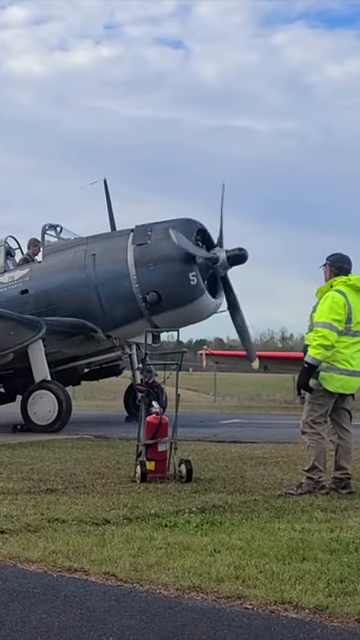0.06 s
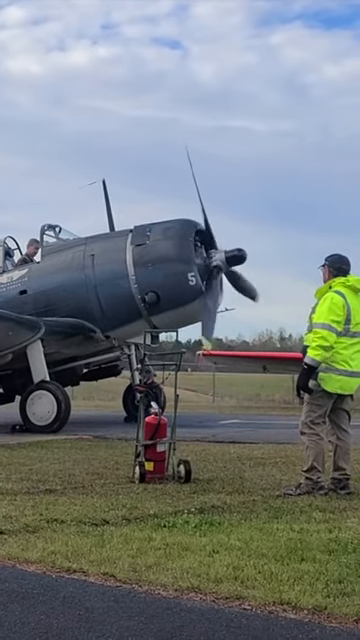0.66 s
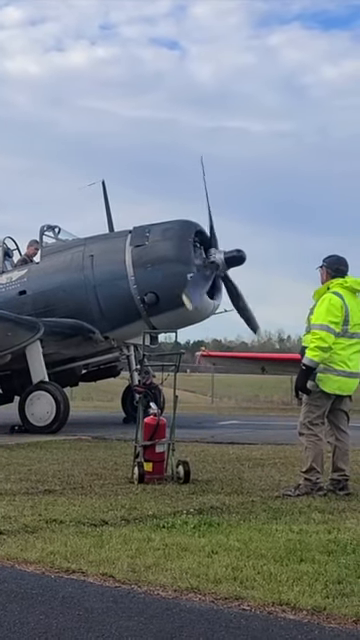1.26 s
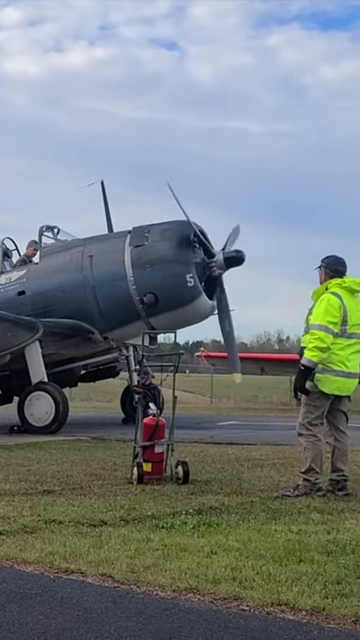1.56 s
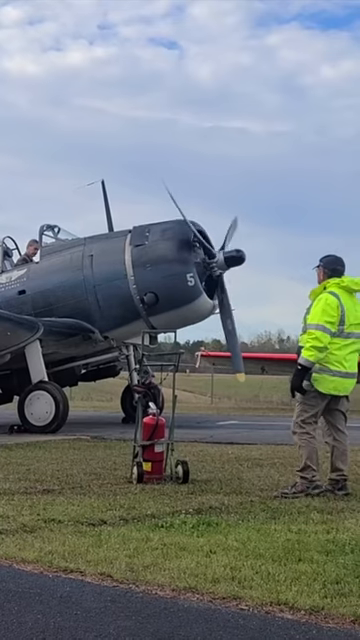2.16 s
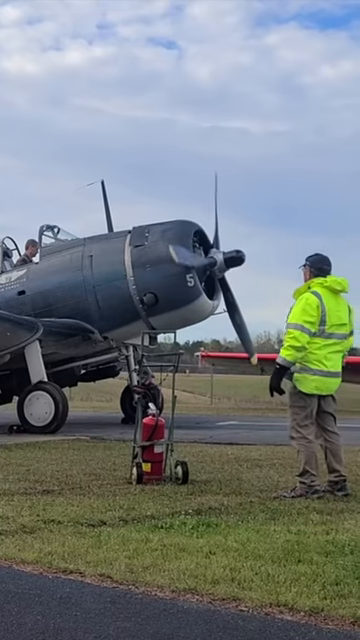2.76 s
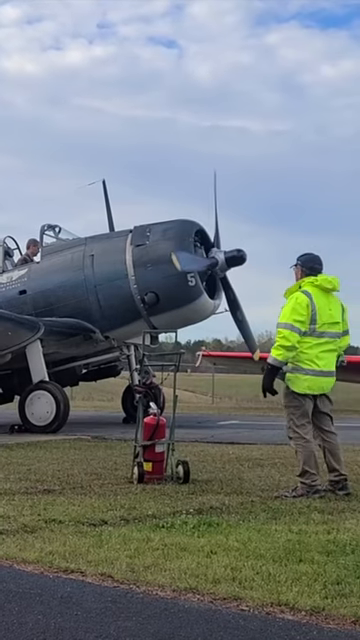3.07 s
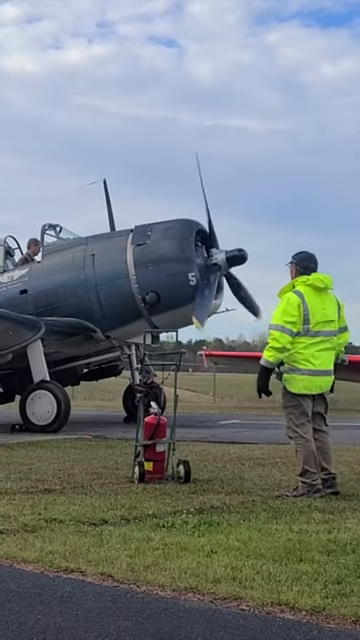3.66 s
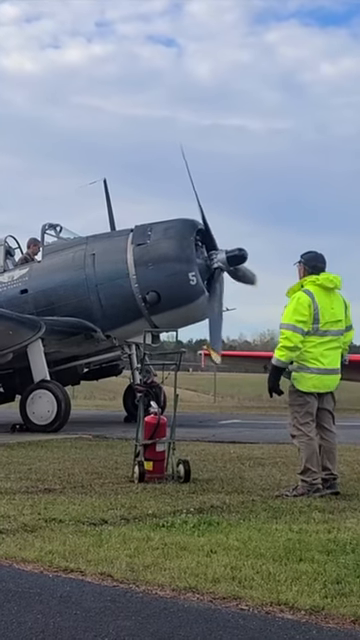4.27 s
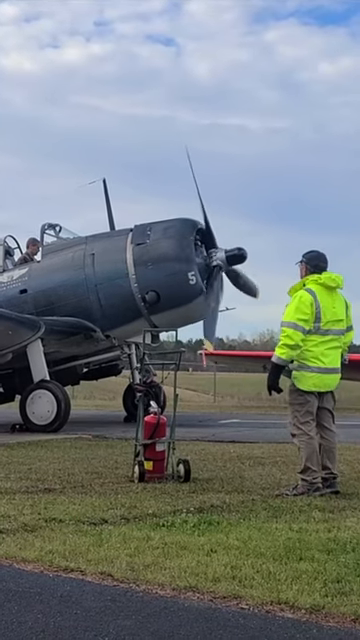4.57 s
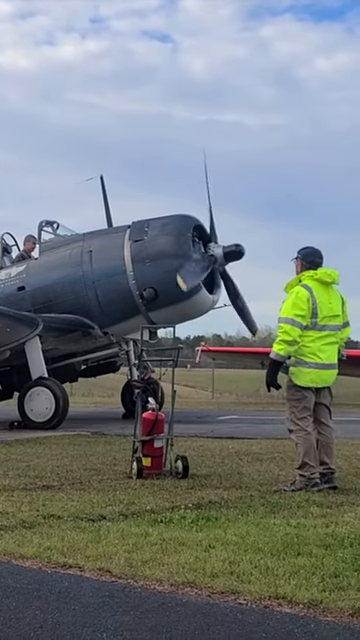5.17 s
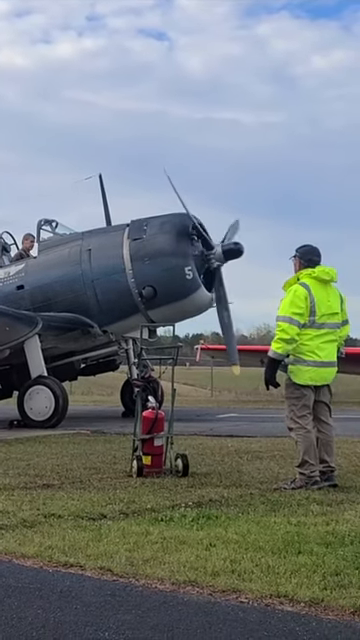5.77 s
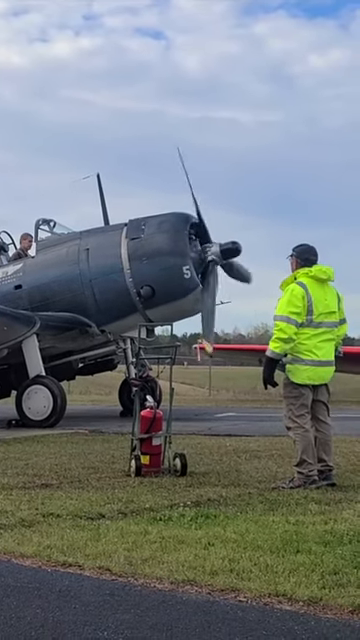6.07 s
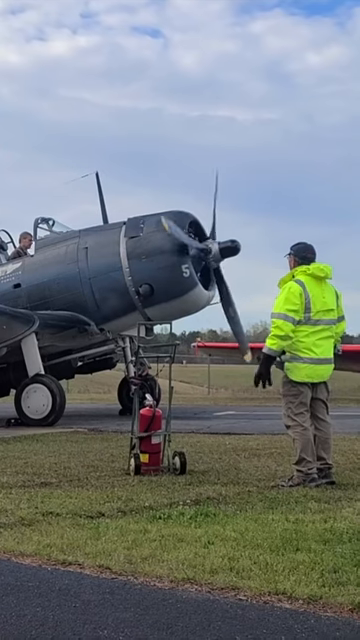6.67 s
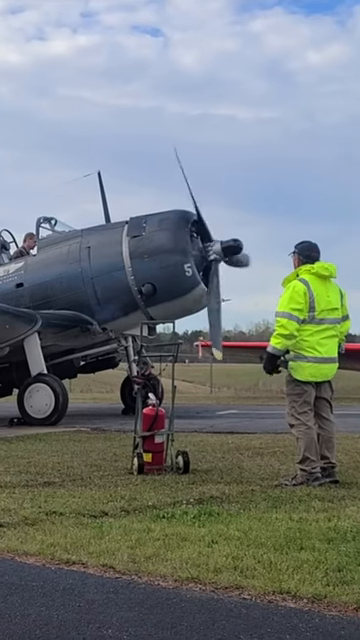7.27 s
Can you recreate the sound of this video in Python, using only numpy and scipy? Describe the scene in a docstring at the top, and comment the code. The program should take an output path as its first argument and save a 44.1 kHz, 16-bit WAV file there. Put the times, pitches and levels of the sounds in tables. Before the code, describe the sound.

An aircraft piston engine fires raggedly at first, then settles into a low, pulsing idle with sharp exhaust spits and mechanical clatter.

```python
"""An open airfield: a nine-cylinder radial aircraft engine idles, stumbling at first, then loping evenly.
Its uneven firings throb and bark through the exhaust; gas hisses out in puffs, one sharp spit a cycle.
Gear backlash rings the crankcase about once a crank turn. Behind it are a dry rasp and the rush of
air stirred by the propeller."""
import sys
import numpy as np
from scipy import signal
from scipy.fft import rfft, irfft, next_fast_len
from scipy.io import wavfile

SR = 44100
rng = np.random.default_rng(int(sys.argv[2]) if len(sys.argv) > 2 else 0)


def to_wav(s):
    """Save 16-bit WAV."""
    ch = np.atleast_2d(s).T  # columns
    pcm = np.round(np.clip(ch, -1, 1) * 32767)  # PCM
    wavfile.write(sys.argv[1], SR, pcm.astype(np.int16))


N = 332073
TIME_S = np.arange(N) / SR
SETTLED_S = 1.545  # end of the stumbling
LEFT_LEAD_S = .00019

# engine levels over time: time_s, throb_db, turbulence_db, gas_db
ENGINE_LEVELS = [(0, -20, 7.5, -26.5), (.6, 0, 8.5, -27.5), (.9, 0, 8, -29), (.95, -13, 12.5, -26),
                 (1.4, 0, 7, -25.5), (2, 0, -1.5, -27.5), (3, 0.1, 2, -28), (4.3, 0, 3, -29),
                 (5.3, 0, 1.5, -27.5), (7.53, 0.5, -8, -28.5)]
# exhaust valve openings at even idle: cycle_share, top_pitch_hz, level_db, swell_s
VALVE_BARKS = [(0.044, 280.0, -14.7, 0.003), (0.081, 276.0, -16.6, 0.0104), (0.15, 234.0, -14.7, 0.0088),
               (0.152, 454.0, -24.2, 0.0072), (0.253, 219.0, -16.2, 0.0091), (0.381, 463.0, -25.1, 0.0085),
               (0.531, 285.0, -19.1, 0.0066), (0.638, 291.0, -14.4, 0.003), (0.645, 274.0, -20.2, 0.0186),
               (0.768, 261.0, -12.4, 0.0076), (0.938, 434.0, -17.6, 0.003), (0.961, 291.0, -7.3, 0.0041)]
# ragged firings: start_s, thump_db, top_pitch_hz, bark_db, swell_s
RAGGED_FIRINGS = [(0.0, 1.9, 244.0, -19.9, 0.014), (0.0314, -9.2, 245.0, -12.7, 0.0093),
                  (0.0787, -2.8, 294.0, -10.1, 0.0085), (0.1248, -0.1, 277.0, -11.3, 0.0084),
                  (0.1481, 0.7, 170.0, -21.2, 0.014), (0.1809, 0.8, 297.0, -24.5, 0.0123),
                  (0.2187, -2.5, 184.0, -11.9, 0.0047), (0.2921, -1.8, 413.0, -16.8, 0.0104),
                  (0.3266, -0.7, 235.0, -9.2, 0.0079), (0.3707, 0.5, 242.0, -23.3, 0.014),
                  (0.429, 0.4, 253.0, -10.3, 0.0091), (0.4988, -2.4, 170.0, -13.4, 0.0087),
                  (0.5314, 2.4, 289.0, -22.3, 0.0137), (0.5865, -5.4, 244.0, -10.7, 0.0076),
                  (0.6133, -6.1, 222.0, -10.2, 0.0114), (0.639, -8.0, 237.0, -9.9, 0.014),
                  (0.6905, -6.8, 289.0, -12.0, 0.014), (0.7478, 2.3, 250.0, -7.8, 0.008),
                  (0.8015, -7.3, 239.0, -13.9, 0.0035), (0.8136, -0.4, 244.0, -18.7, 0.0104),
                  (0.85, 1.4, 170.0, -17.1, 0.0033), (0.9162, 2.9, 441.0, -15.4, 0.0107),
                  (0.9599, 0.1, 253.0, -10.9, 0.0085), (1.0078, -2.8, 306.0, -10.7, 0.0115),
                  (1.0544, -0.1, 239.0, -8.9, 0.0085), (1.0876, 1.9, 253.0, -21.4, 0.014),
                  (1.1131, 3.4, 270.0, -21.1, 0.014), (1.1617, -3.5, 315.0, -9.4, 0.0062),
                  (1.2079, 2.2, 261.0, -9.5, 0.0094), (1.2544, 2.4, 246.0, -12.4, 0.0106),
                  (1.308, -6.3, 301.0, -9.3, 0.0057), (1.3524, 1.3, 285.0, -10.3, 0.0051),
                  (1.3756, 2.9, 269.0, -12.6, 0.0034), (1.4409, 0.1, 307.0, -13.0, 0.013),
                  (1.502, 2.2, 382.0, -13.8, 0.003)]


def exhaust(jostle_s=.0008):
    """All pipe sound, left ear first; uneven burns jostle the crank and so the firing times."""
    lag_s = jostle_s * np.log(flutter(per_s=9, depth_db=20 / np.log(10)))
    firing = delayed(throb() + barks(), lag_s) + stumbling() + turbulence() + pipe_hum()
    pipes = signal.sosfilt(signal.butter(6, 450, fs=SR, output="sos"), firing)  # valves open gradually
    # open stacks radiate no steady pressure
    pipes = signal.sosfilt(signal.butter(2, 22, "high", fs=SR, output="sos"), pipes)
    return np.array([pipes * from_db(-.35), delayed(pipes, LEFT_LEAD_S)])


def throb(nominal_cycle_s=.269):
    """Nine pressure pulses ring the exhaust and merge into a deep lope whose pitch follows crank speed."""
    # cylinder pulses: cycle_share, level_db
    pulses = [(0.1317, 6.9), (0.2118, -1.5), (0.242, 2.0), (0.3152, 4.8), (0.4744, -0.0), (0.626, 6.5),
              (0.7516, 1.9), (0.8122, 3.4), (0.9038, 1.3)]
    # deep exhaust resonances at nominal speed: pitch_hz, width_hz, gain_db
    modes = [(52.9, 2.8, 34.0), (70.7, 2.9, 45.1), (91.7, 3.8, 51.0), (120.4, 0.9, 49.3)]
    share, db = np.transpose(pulses)
    cycles = np.arange(12)
    pulse_s = (cycles[:, None] + share) * nominal_cycle_s
    steady = resonate(clicks(pulse_s, np.tile(db, len(cycles))), modes)
    # loop one cycle, ten in, where the ringing has settled
    position = (crank() % 1 + 10) * nominal_cycle_s * SR
    lope = np.interp(position, np.arange(N), steady) * settled()
    throb_db, _, _ = in_time(ENGINE_LEVELS)
    return lope * from_db(throb_db) * flutter(per_s=20, depth_db=.9)


def barks(scatter_db=1.5, pitch_scatter=.018):
    """Valves bark at even idle, varying with each burn; a fouled cylinder adds a cough for a spell."""
    # fouled cylinder: cycle_share, top_pitch_hz, level_db, swell_s, from_s, until_s
    coughs = [(0.768, 243, -21.5, 0.0079, 4.1, 7)]
    # engine load: time_s, level_db
    load = [(1.6, 1.6), (2.5, -1.2), (3.8, -.16), (4.6, .62), (7.5, .5)]
    notes = [(s, hz, db, swell_s) for share, hz, db, swell_s in VALVE_BARKS
             for s in every_cycle([share]).ravel()]
    notes += [(s, hz, db, swell_s) for share, hz, db, swell_s, from_s, until_s in coughs
              for s in every_cycle([share]).ravel() if from_s < s < until_s]
    start_s, hz, db, swell_s = np.transpose(notes)
    burn, heat = rng.standard_normal((len(start_s), 2)).T
    load_db, = in_time(load, start_s)
    varied = np.c_[start_s, hz * (1 + pitch_scatter * heat), db + load_db + scatter_db * burn, swell_s]
    return pipe_notes(varied[start_s > SETTLED_S])


def stumbling():
    """Ragged firings thump the collector and bark in the stacks; after a miss the engine chuffs hard."""
    # collector resonances: pitch_hz, width_hz, gain_db
    collector_modes = [(67.3, 16.8, 46.5), (73.8, 9.3, 50.5), (99.5, 5.1, 51.5)]
    # catches after a miss: start_s, level_db
    catches = [(.002, 2), (.302, -3), (.619, -4), (.914, -3)]
    # stack resonances: pitch_hz, width_hz, gain_db
    stack_modes = [(217, 45, 31), (340, 37, 26.5), (410, 22, 31)]
    start_s, thump_db, hz, bark_db, swell_s = np.transpose(RAGGED_FIRINGS)
    thumps = resonate(clicks(start_s, thump_db), collector_modes)
    chuffs = resonate(clicks(*np.transpose(catches)), stack_modes)
    return thumps + chuffs + pipe_notes(np.c_[start_s, hz, bark_db, swell_s])


def pipe_notes(notes, sweep_share=.87):
    """Each slug of hot gas sounds a short, round note whose pitch sweeps up as the pipe fills."""
    out = np.zeros(N + SR)
    t = np.arange(SR // 8) / SR
    for start_s, top_hz, db, swell_s in notes:
        age, at = t / swell_s, int(start_s * SR)
        turns = top_hz * (t - sweep_share * swell_s * (1 - np.exp(-age)))
        envelope = (age * np.exp(1 - age)) ** 2
        out[at:at + len(t)] += from_db(db) * envelope * np.sin(2 * np.pi * turns)
    return out[:N]


def turbulence(even_db=-21, ragged_db=-22):
    """Turbulence trails each slug of gas and roughens the pipes."""
    # upper pipe resonances: pitch_hz, width_hz, gain_db
    modes = [(165, 30, 29.5), (219.6, 35.7, 23.8), (276, 14, 22), (396, 10, 20)]
    share, _, db, _ = np.transpose(VALVE_BARKS)
    even_s = every_cycle(share)
    even = bursts(even_s, np.broadcast_to(db + even_db, even_s.shape), rise_s=.0012, decay_s=.039)
    ragged_s, _, _, bark_db, _ = np.transpose(RAGGED_FIRINGS)
    ragged = bursts(ragged_s, bark_db + ragged_db, rise_s=.0027, decay_s=.03)
    swirl = (even * settled() + ragged) * rng.standard_normal(N)
    _, turbulence_db, _ = in_time(ENGINE_LEVELS)
    return from_db(turbulence_db) * resonate(swirl, modes)


def pipe_hum(pitch_hz=396, width_hz=26):
    """Gas streaming through the stacks keeps their upper resonance sounding between firings."""
    # time_s, level_db
    flow = [(0, -22), (.85, -17), (1.05, -9), (2.5, -16), (5, -12), (6.2, -7.5), (7.5, -2.5)]
    flow_db, = in_time(flow)
    return resonate(from_db(flow_db) * rng.standard_normal(N), [(pitch_hz, width_hz, 0)])


def gas(leak_db=-6, scatter_db=1.85):
    """Hiss puffs out in step with the valves, over a steady leak."""
    # gas puffs: cycle_share, level_db, decay_s
    puffs = [(0.062, -5, 0.024), (0.14, 3.5, 0.02), (0.203, 1.5, 0.018), (.3, -3, 0.058), (0.42, -3, 0.038),
             (.585, 0, 0.013), (.68, 2.5, 0.012), (0.738, 2, 0.02), (.81, 1.5, 0.03), (0.931, 4, 0.036)]
    # hiss spectrum: frequency_hz, density_db
    colour = [(350, -35), (600, 1), (850, -9), (1300, 0), (1370, -11), (1500, 5), (1640, -1), (1820, -2),
              (2380, -6), (3000, 1.5), (3700, -1), (5170, -8.5), (5990, 1), (8280, -9), (10200, -6.5),
              (11900, 1), (14700, -3.5), (15800, -7)]
    power = from_db(leak_db) ** 2
    for share, db, decay_s in puffs:
        start_s = every_cycle([share])
        puff_db = db + scatter_db * rng.standard_normal(start_s.shape)
        power = power + bursts(start_s, puff_db, rise_s=.0031, decay_s=decay_s) ** 2
    _, _, gas_db = in_time(ENGINE_LEVELS)
    return from_db(gas_db) * np.sqrt(power) * flutter(per_s=190, depth_db=1.5) * stereo_noise(colour)


def spits(cycle_share=.995, scatter_db=.7, leak_db=-8, leak_lead_s=.0083):
    """A hard firing leaks past the opening valve, then cracks out as a short, bright jet."""
    # one cylinder's spit, once a cycle: time_s, level_db
    strength = [(0, -19), (.72, -18), (1.6, -21.5), (1.87, -21), (2.14, -21), (2.4, -24), (2.66, -21),
                (2.93, -25.5), (3.45, -18.5), (3.72, -24.5), (3.98, -23), (4.25, -18), (4.5, -22),
                (4.78, -21), (5.05, -18.5), (5.33, -18), (5.6, -22), (5.87, -17.5), (6.14, -18.5),
                (6.42, -20.5), (6.69, -22), (6.97, -22), (7.5, -19)]
    # afterfires of unburnt fuel while the engine clears: start_s, level_db
    afterfires = [(0.316, -20), (0.397, -28), (0.558, -15.5), (0.626, -21), (0.942, -19), (1.092, -20),
                  (1.173, -17), (1.739, -21.5), (2.005, -18.5)]
    regular_s = every_cycle([cycle_share]).ravel()
    regular_db = in_time(strength, regular_s)[0] + scatter_db * rng.standard_normal(len(regular_s))
    stray_s, stray_db = np.transpose(afterfires)
    start_s, db = np.r_[regular_s, stray_s], np.r_[regular_db, stray_db]
    jet = bursts(start_s, db, rise_s=.0013, decay_s=.0062)
    leak = bursts(start_s - leak_lead_s, db + leak_db, rise_s=.0094, decay_s=.0076)
    # frequency_hz, density_db
    colour = [(500, -4), (1400, 8), (2500, 9.5), (3400, 11.5), (5000, 9), (6000, 12.5), (8500, 7),
              (11700, 14.5), (16000, 10)]
    return (jet + leak) * flutter(per_s=980, depth_db=4) * stereo_noise(colour)


def clanks(drive_db=16, knock_db=41, chatter_db=-17, scatter_db=1.2, diffuse_db=-10, rise_s=.0018):
    """Gear backlash closes with a brief rattle that rings the case; lighter chatter fills the gaps."""
    # load reversals on the crank: cycle_share, level_db
    reversals = [(.132, -26), (.2, -51), (.423, -38.5), (0.638, -23), (.918, -31.5), (0.969, -30.5)]
    # jerks of the stumbling crank: start_s, level_db
    jerks = [(.007, -26), (0.081, -39), (0.135, -34), (0.226, -32), (.27, -38), (0.342, -28), (0.396, -35),
             (.447, -28), (.617, -29), (0.713, -19), (.852, -36), (0.919, -16), (1.009, -24), (1.087, -26),
             (1.18, -44)]
    # crankcase and cowling resonances: pitch_hz, width_hz, gain_db
    case_modes = [(732, 11, -5), (939, 55, -7.5), (1083.5, 60, 1), (1191, 83, -3.5), (1538, 37, -3),
                  (1814, 90, -6.5), (1973, 18.6, -0.5)]
    # frequency_hz, density_db
    colour = [(300, -1), (700, -6), (2000, -4), (4000, -1.5), (16000, -16.5)]
    share, regular_db = np.transpose(reversals)
    regular_s = every_cycle(share)
    regular_db = regular_db + scatter_db * rng.standard_normal(regular_s.shape)
    jerk_s, jerk_db = np.transpose(jerks)
    after_jerks = regular_s > jerk_s[-1]
    start_s, db = np.r_[jerk_s, regular_s[after_jerks]], np.r_[jerk_db, regular_db[after_jerks]]
    blows = bursts(start_s, db + drive_db, rise_s, decay_s=.0074)
    chatter = from_db(chatter_db) * flutter(per_s=74, depth_db=4)
    force = np.tanh(blows + chatter)  # the oil film cushions the hardest blows
    direct = left_first(stereo_noise(colour)[0])
    rattle = force * (direct + from_db(diffuse_db) * stereo_noise(colour))
    # the first hard contact gives each clank a firm, pitched core
    knocks = left_first(clicks(start_s + rise_s, np.minimum(db, -23) + knock_db))
    # the teeth meet differently each time and favour other resonances
    return sum((-1) ** k * flutter(per_s=12, depth_db=1.4) * resonate(rattle + knocks, [mode])
               for k, mode in enumerate(case_modes))


def rasp():
    """A dry rasp that swells irregularly, most of all while the engine clears."""
    # time_s, level_db
    swells = [(0, -45), (.6, -32), (1.3, -35.5), (2.25, -37), (2.45, -57), (3.8, -40), (4.4, -40),
              (5.6, -38.5), (6.15, -37), (6.35, -38), (7.5, -52)]
    # frequency_hz, density_db
    colour = [(1200, -26), (2400, -4), (3100, -.5), (3800, -7), (5200, -15), (12000, -35)]
    level_db, = in_time(swells)
    return from_db(level_db) * flutter(per_s=26, depth_db=3) * stereo_noise(colour)


def propeller(level_db=-32):
    """Rush of stirred air around the blades."""
    # air spectrum: frequency_hz, density_db
    colour = [(30, 3), (60, -3), (140, 12), (200, 10.5), (310, 7), (400, 11), (490, -1), (850, -1),
              (1150, -15), (2200, -2.5), (8000, -9), (16000, -22)]
    return from_db(level_db) * flutter(per_s=25, depth_db=4) * stereo_noise(colour)


def ground_bounce(x, lag_s=.0022, echo_db=-9):
    """The pavement returns a weaker copy just after the direct sound."""
    return x + from_db(echo_db) * np.array([delayed(ear, lag_s) for ear in x])


def crank(start_share=.692):
    """Four-stroke cycles done at each sample, two turns to a cycle."""
    # the crank labours, picks up as the cylinders clear, then settles: time_s, speed_rpm
    speed = [(0, 399), (.65, 375), (1.15, 410), (1.45, 414.7), (1.85, 455.7), (2.4, 457.5), (3, 452.4),
             (3.9, 458.3), (4.55, 445.2), (5.9, 437.2), (7.53, 439.8)]
    rpm, = in_time(speed)
    return start_share + np.cumsum(rpm) / (2 * 60 * SR)


def every_cycle(shares):
    """Times (s) at which the crank reaches these shares, shape (cycles, shares); -1 outside the scene."""
    done = crank()
    cycles = np.arange(int(done[-1]) + 1)
    return np.interp(cycles[:, None] + np.asarray(shares), done, TIME_S, left=-1, right=-1)


def settled(fade_s=.05):
    """0 while the engine stumbles, 1 once it runs evenly."""
    return np.clip((TIME_S - SETTLED_S) / fade_s + .5, 0, 1)


def clicks(start_s, db):
    """One impulse of the given level at each start."""
    out = np.zeros(N)
    at = np.round(np.ravel(start_s) * SR).astype(int)
    inside = (at >= 0) & (at < N)
    np.add.at(out, at[inside], from_db(np.ravel(db))[inside])
    return out + 1e-18


def bursts(start_s, db, rise_s, decay_s):
    """Envelope of bursts that each peak at their level; overlaps add in power."""
    t = np.arange(SR // 5) / SR
    shape = ((1 - np.exp(-t / rise_s)) * np.exp(-t / decay_s)) ** 2
    power = signal.fftconvolve(clicks(start_s, db) ** 2, shape / shape.max())[:N]
    return np.sqrt(np.abs(power))


def resonate(x, modes):
    """Parallel resonances of alternating sign."""
    out = 0
    for k, (hz, width_hz, db) in enumerate(modes):
        r = np.exp(-np.pi * width_hz / SR)
        zeros = np.array([1, 0, -1]) * (1 - r * r) / 2
        poles = [1, -2 * r * np.cos(2 * np.pi * hz / SR), r * r]
        out = out + (-1) ** k * from_db(db) * signal.lfilter(zeros, poles, x)
    return out


def flutter(per_s, depth_db):
    """A gain that wanders at random."""
    knots = rng.standard_normal(N // 40)
    return from_db(depth_db * np.interp(TIME_S * per_s, np.arange(len(knots)), knots))


def stereo_noise(colour):
    """Coloured noise, alike in both ears in the bass and unrelated in the treble; rms 1."""
    # likeness of the ears: frequency_hz, likeness (1 or more is fully correlated)
    likeness = [(60, 24), (180, 4.5), (330, 1.1), (640, 0.87), (1400, 0.56), (2500, -0.16), (6000, 0.03),
                (15000, 0)]
    # ear balance: frequency_hz, left_minus_right_db
    balance = [(60, -16), (92, -36), (140, -6), (210, -2), (330, 3), (500, -1), (770, 0), (1170, 4),
               (1790, -3), (2740, -4.5), (4190, -5), (6410, -1.5), (9810, -3.5), (15000, -4.5)]
    size = next_fast_len(N, real=True)
    hz = np.fft.rfftfreq(size, 1 / SR)
    mid, side = rfft(rng.standard_normal((2, size)))
    alike = np.clip(at_hz(likeness, hz), -1, 1)
    ear_sign = np.array([[1], [-1]])
    white = np.sqrt(1 + alike) * mid + np.sqrt(1 - alike) * side * ear_sign
    gain = from_db(at_hz(colour, hz) + ear_sign * at_hz(balance, hz) / 2)
    noise = irfft(white * gain, size)[:, :N]
    return noise / np.sqrt(np.mean(noise ** 2) + 1e-20)


def left_first(x, left_db=-2):
    return np.array([x * from_db(left_db), delayed(x, LEFT_LEAD_S)])


def delayed(x, lag_s):
    return np.interp(np.arange(N) - lag_s * SR, np.arange(N), x)


def in_time(rows, at_s=TIME_S):
    time_s, *columns = np.transpose(rows)
    return [np.interp(at_s, time_s, column) for column in columns]


def at_hz(points, hz):
    point_hz, values = np.transpose(points)
    return np.interp(np.log(hz + 1), np.log(point_hz), values)


def from_db(db):
    return 10 ** (np.asarray(db) / 20)


def scene():
    return exhaust() + ground_bounce(gas() + spits()) + rasp() + clanks() + propeller()


def record(dry):
    """Steep low-pass at 15.9 kHz."""
    return signal.sosfilt(signal.ellip(12, .1, 90, 15900, fs=SR, output="sos"), dry)


dry = scene()
out = record(dry)
to_wav(out)
```